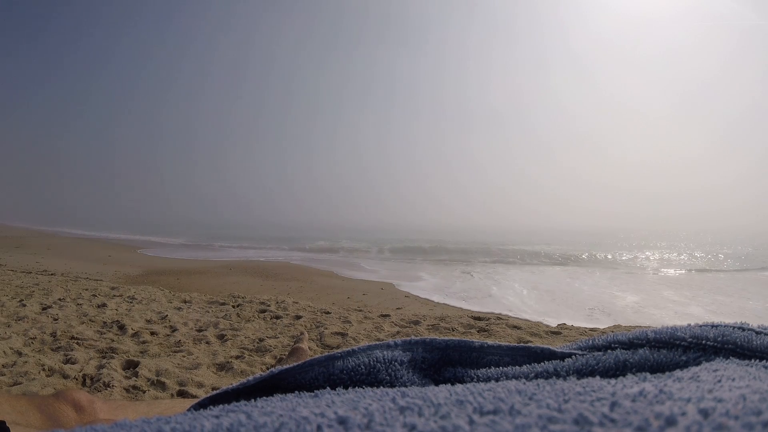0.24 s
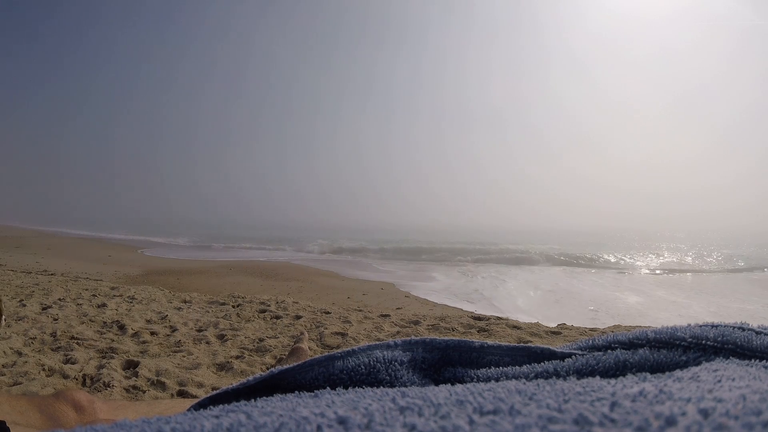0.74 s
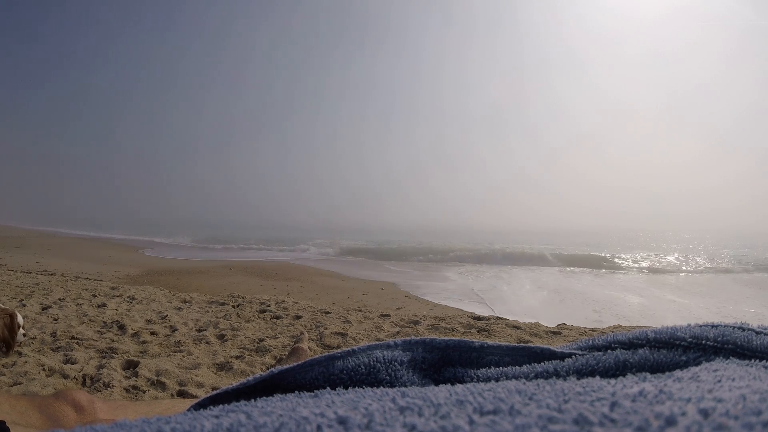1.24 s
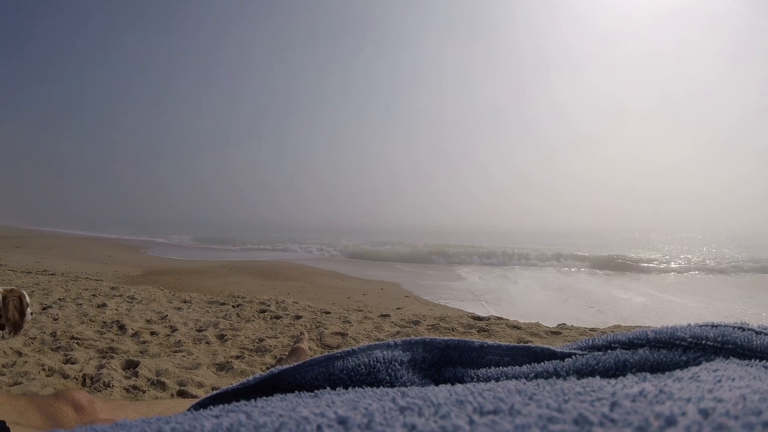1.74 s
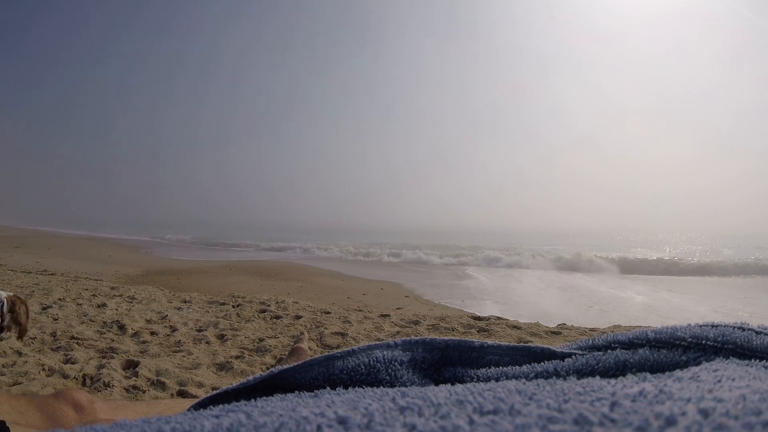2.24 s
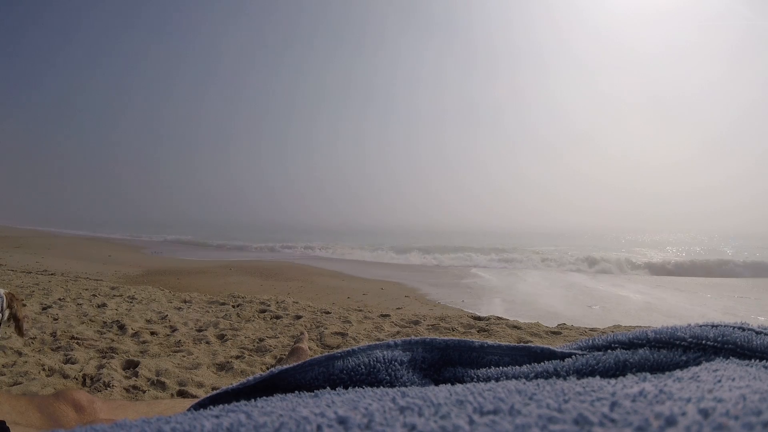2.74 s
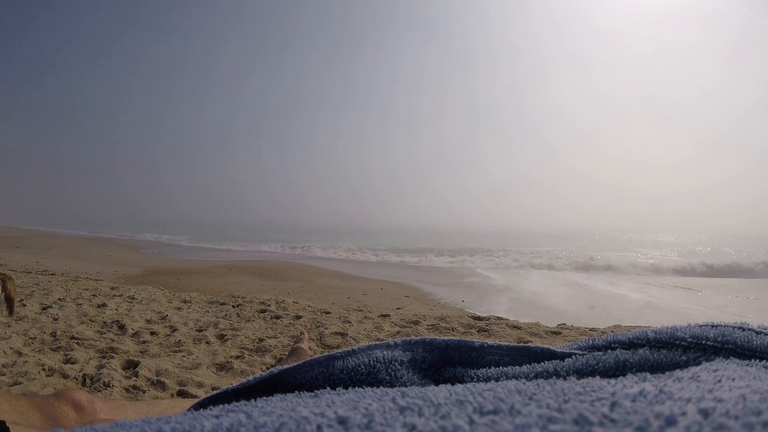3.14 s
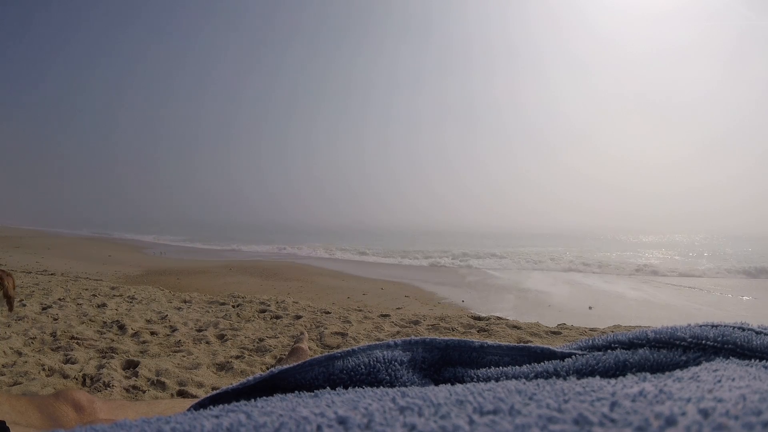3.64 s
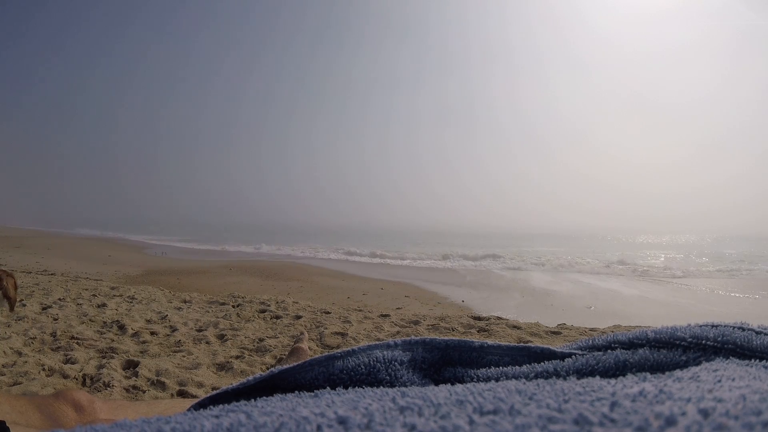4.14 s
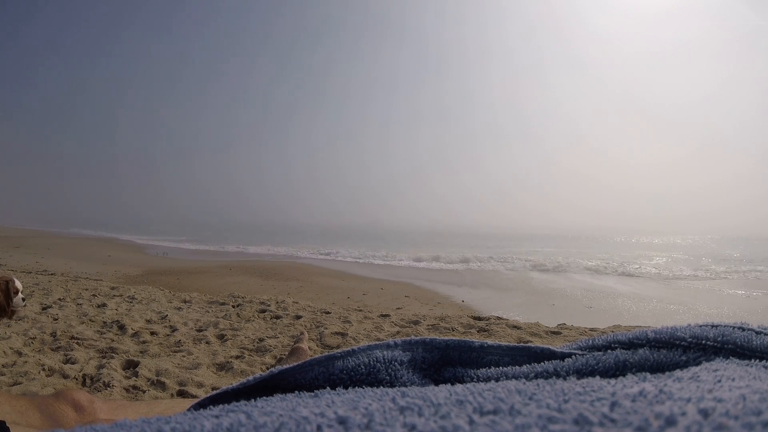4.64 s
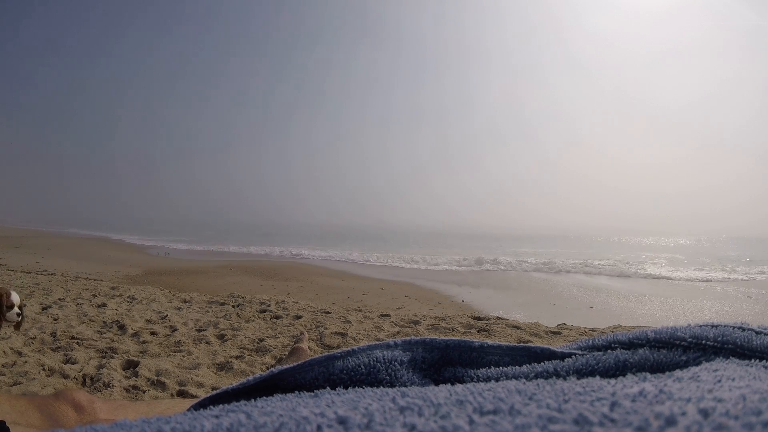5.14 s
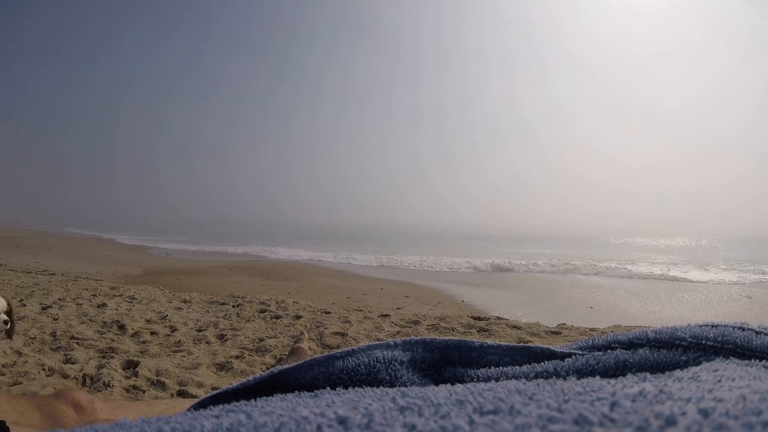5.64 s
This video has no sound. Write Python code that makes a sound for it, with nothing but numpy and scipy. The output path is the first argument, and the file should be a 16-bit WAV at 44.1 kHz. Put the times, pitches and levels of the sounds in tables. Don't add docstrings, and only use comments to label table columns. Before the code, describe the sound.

An open beach with no echo, heard through a small housed microphone in gusty wind. At first the surf is only a faint wash beneath low wind rumble. From about 0.5 s the wind stiffens, with dull thumps near 0.6 s and a tight cluster of hard pops around 1.4 to 1.5 s. Meanwhile a small wave swells, its crest tipping over with a brief spray of hiss near 1.5 s. From 1.9 to 3.8 s it is fullest: low roar, broad mid rush and fine bright fizz, gently uneven. Wind keeps buffeting in deep, broken flutters, popping near 2.6 and 3.0 s. After 4 s the wave falls away to quiet wash and lingering foam. The wind weakens, with separate thuds around 4.55, 4.85, 5.3 and 5.8 s. A thin, steady hiss of far surf and microphone noise stays behind, the highest treble cut off, until the end at about 5.9 s.

```python
import sys
import numpy as np
from scipy import signal
from scipy.fft import rfft, irfft, next_fast_len
from scipy.io import wavfile
from scipy.ndimage import uniform_filter1d, map_coordinates

SR = 44100
rng = np.random.default_rng(int(sys.argv[2]) if len(sys.argv) > 2 else 0)


def materialize(psi):
    bounded = np.clip(np.atleast_2d(psi).T, -1, 1)
    quanta = np.round(bounded * 32767).astype(np.int16)
    wavfile.write(sys.argv[1], SR, quanta)


def volts_from_db(level):
    exponent = np.asarray(level, float) / 20
    return 10 ** exponent


N = 259308

# t/s, level/dB
WAVE_ENERGY = [(0, -45), (.4, -42), (.8, -38.5), (1.1, -36.5), (1.4, -34), (1.65, -32.5), (1.9, -30.5),
               (2.2, -30), (2.9, -31), (3.45, -30.5), (3.8, -31.5), (4.1, -33), (4.4, -34.5), (4.65, -37),
               (4.9, -37.5), (5.15, -37), (5.5, -38), (5.88, -37.5)]
# f/Hz, density/dB
ROAR_SPECTRUM = [(60, -23), (150, 2.5), (250, -1), (500, -8.5), (800, -13), (1300, -25), (2500, -120)]
# f/Hz, density/dB
RUSH_SPECTRUM = [(200, -120), (450, -14.5), (800, -1.5), (1100, -0.5), (1500, -3), (2200, -7.5),
                 (3000, -12.5), (4100, -20.5), (5500, -120)]
# f/Hz, density/dB
FOAM_SPECTRUM = [(2500, -120), (3600, -15.5), (4300, -5.5), (4900, 0), (5500, 0), (6150, -2.5),
                 (6600, -15.5), (7400, -13), (10900, -20.5), (12000, -33), (13000, -30), (15000, -41)]
# t/s, level/dB
WIND_STRENGTH = [(0, -23), (.4, -28.5), (.56, -25.5), (.8, -17.5), (1.5, -17), (1.72, -21), (2.05, -20),
                 (2.3, -18), (2.65, -16), (2.9, -20.5), (3.3, -20), (3.55, -18), (3.9, -22.5), (4.45, -25),
                 (5.05, -26), (5.28, -19.5), (5.55, -23), (5.88, -22)]
# t/s, change/dB, half-length/s, fineness/1 (0 large eddies, 1 small)
PUFFS_AND_LULLS = [(0.017, -17, 0.063, 0.88), (0.436, -7, .03, .1), (0.544, -5, 0.035, 1),
                   (.6, 6, .02, 0.41), (.65, -14, 0.026, .5), (0.776, -8, 0.067, 0.95),
                   (0.913, -1.5, 0.033, 0.092), (1.372, -10.5, 0.022, 0.75), (1.73, -5.5, .09, .05),
                   (2.196, -6, 0.024, .05), (2.338, -5, 0.074, 1), (2.71, -17, 0.026, 0.66),
                   (2.76, 1, .03, .05), (2.864, -4, .04, .05), (3.0, -6, 0.03, 0.89),
                   (3.035, 3.5, .03, .75), (3.19, -8, .04, 0.65), (3.456, -5, .025, 0.55),
                   (3.663, -9, 0.047, 0.44), (4.044, 7, 0.021, .1), (4.56, 4.5, 0.044, 0.93),
                   (4.688, 5.5, 0.035, .3), (4.865, 7, 0.055, .05), (4.9, -10, .02, .05),
                   (4.973, 5, 0.025, 0.45), (5.385, -18, 0.022, 1), (5.394, 5, 0.043, .05),
                   (5.505, -5.5, 0.045, 0.74), (5.642, 5.5, 0.037, .05), (5.76, 2, .05, 0.86)]
# f/Hz, density/dB
LARGE_EDDIES = [(6, -21), (20, 0), (35, -4), (60, 0), (90, -8.5), (140, -30), (250, -120)]
# f/Hz, density/dB
SMALL_EDDIES = [(30, -120), (60, -21), (90, 0), (130, -6), (200, -13), (320, -35), (600, -120)]
# t/s, peak level/dB, f/Hz, rise/s, raggedness/1 (0 to 1)
PORT_STRIKES = [(0.587, -17, 121, 0.0063, 0.07), (.678, -8, 151, 0.0065, 0.4),
                (1.395, -9, 162, 0.0058, 0.66), (1.411, -19, 130, 0.0066, .7), (1.434, -4.5, 108, .008, 0),
                (1.484, -5.5, 163.4, 0.0055, 0.4), (2.632, -8.5, 133, 0.0054, 0.15),
                (3.039, -11, 108, 0.004, 0), (4.118, -22, 170, 0.0046, .2), (4.542, -8.5, 70, 0.0071, 0),
                (4.576, -7.5, 196, 0.009, 0.08), (4.852, -11.5, 102, 0.0092, 0.4),
                (5.301, -9.5, 127, 0.0057, 0.36), (5.758, -16, 150, 0.0052, 0.45),
                (5.81, -13, 140, 0.0043, 0.65)]
# f/Hz, density/dB
HISS_SPECTRUM = [(3000, -120), (6000, 3), (7500, -0.5), (10900, -3.5), (12000, -14), (13000, -8),
                 (15000, -22)]

CREST_DB = -30
TIME = np.arange(N) / SR


def surf():
    rush_db, = curves(WAVE_ENERGY)
    swing_db = rush_db - CREST_DB
    surge = wobble(rate=7)
    return roar(swing_db, surge) + rush(rush_db, surge) + foam(swing_db, surge)


def roar(swing_db, surge):
    lead_s, growth = 0.033, 1.1
    level_db = CREST_DB + 1.25 + growth * later(swing_db, -lead_s, 0)
    return volts_from_db(level_db + 7 + 0.56 * surge) * coloured(patchy(patchy_db=0.64), ROAR_SPECTRUM)


def rush(rush_db, surge):
    return volts_from_db(rush_db + 0.85 + 0.49 * surge) * coloured(patchy(patchy_db=0.33), RUSH_SPECTRUM)


def foam(swing_db, surge):
    lag_s, spread_s, growth = 0.15, 0.33, 0.94
    gathers_db_per_s, spray_db = 0.5, 0.6
    level_db = CREST_DB - 13 + growth * later(swing_db, lag_s, spread_s)
    level_db = level_db + gathers_db_per_s * (np.arange(N) - N / 2) / SR
    gain = volts_from_db(level_db + 0.94 + spray_db * spray() + 0.21 * surge)
    return gain * coloured(patchy(patchy_db=0.5), FOAM_SPECTRUM)


def spray():
    peak_s, lasts_s = 1.46, 0.35
    return np.exp(-((TIME - peak_s) / lasts_s) ** 2)


def buffeting():
    large_db, small_db = gusts()
    large = steadied(coloured(rng.standard_normal(N), LARGE_EDDIES), share=0.34)
    lumps = volts_from_db(0.82 * wobble(rate=35))
    small = steadied(lumps * coloured(rng.standard_normal(N), SMALL_EDDIES), share=0.8)
    return volts_from_db(large_db + 1.1) * large + volts_from_db(small_db - 0.5) * small


def gusts():
    breeze_db, small_db, small_growth = -24, -1.5, 0.87
    strength_db, = curves(WIND_STRENGTH)
    s, change_db, length_s, fine = np.transpose(PUFFS_AND_LULLS)[:, :, None]
    bells = change_db * np.exp(-((TIME - s) / np.maximum(length_s, 0.005)) ** 2)
    large_puffs = np.sum(np.clip(2 - 2 * fine, 0, 1) * bells, axis=0)
    small_puffs = np.sum(np.clip(2 * fine, 0, 1) * bells, axis=0)
    small_wind = breeze_db + small_db + small_growth * (strength_db - breeze_db)
    return strength_db + large_puffs, small_wind + small_puffs


def pops():
    out = np.zeros(N + SR)
    t = np.arange(SR // 10) / SR
    phases = rng.uniform(0, 2 * np.pi, (len(PORT_STRIKES), 2))
    for (s, db, hz, rise_s, ragged), (phase, edge) in zip(PORT_STRIKES, phases):
        u = t / max(rise_s, 1e-3)
        turn = 2 * np.pi * hz * t * (1 - 0.0904 * np.minimum(u, 4))
        swing = np.sin(turn + phase) + ragged * np.sin(2.496 * turn + edge)
        envelope = u ** 2 * np.exp(2 - 2 * u)
        start = round(s * SR)
        out[start:start + len(t)] += volts_from_db(db) * swing * envelope
    return out[:N]


def hiss():
    return volts_from_db(-61.5 + 5 * spray()) * coloured(rng.standard_normal(N), HISS_SPECTRUM)


def unit(x):
    return x / np.sqrt(np.mean(x ** 2) + 1e-20)


def curves(rows):
    s, *columns = np.transpose(rows)
    return [np.interp(TIME, s, column) for column in columns]


def wobble(rate):
    knots = rng.standard_normal(600)
    return map_coordinates(knots, [np.arange(N) * rate / SR], mode="wrap")


def later(x, lag_s, spread_s):
    delayed = np.interp(TIME - lag_s, TIME, x)
    return uniform_filter1d(delayed, max(int(spread_s * SR), 1), mode="nearest")


def coloured(x, spectrum):
    m = next_fast_len(N + 8192)
    hz, db = np.transpose(spectrum)
    bins_hz = np.fft.rfftfreq(m, 1 / SR)
    gain = volts_from_db(np.interp(np.log(bins_hz + 1), np.log(hz + 1), db))
    return unit(irfft(rfft(x, m) * gain, m)[:N])


def patchy(patchy_db):
    z = signal.stft(rng.standard_normal(N), nperseg=512)[2]
    field = uniform_filter1d(rng.standard_normal(z.shape), size=6, axis=0)
    field = uniform_filter1d(field, size=14, axis=1)
    return signal.istft(z * volts_from_db(patchy_db * unit(field)), nperseg=512)[1][:N]


def steadied(x, share):
    swell = uniform_filter1d(uniform_filter1d(x ** 2, size=2600), size=2600)
    return unit(x / (np.abs(swell) + 1e-6) ** (share / 2))


def scene():
    return (surf() + buffeting() + pops() + hiss())[None]


def low_pass(x):
    return signal.sosfilt(signal.butter(12, 15260, fs=SR, output="sos"), x)


def record(dry):
    top, knee = 0.8, 3.5
    rounded = dry / (1 + np.abs(dry / top) ** knee) ** (1 / knee)
    return low_pass(rounded)


dry = scene()
out = record(dry)
materialize(out)
```